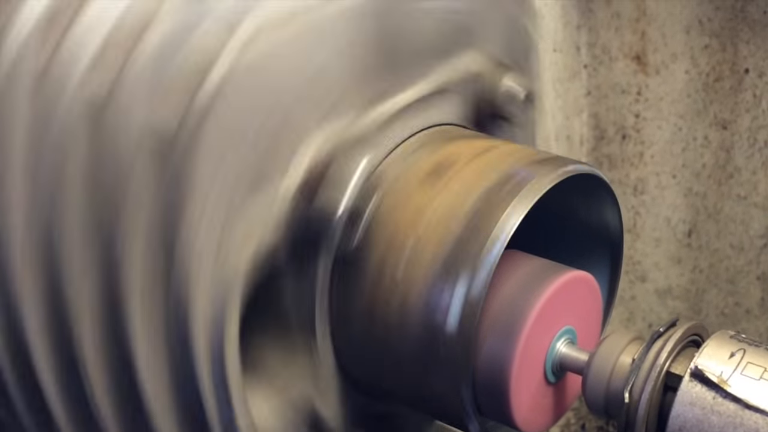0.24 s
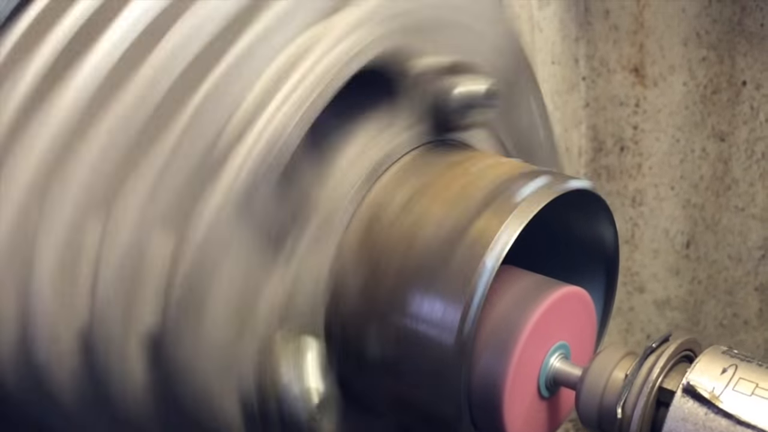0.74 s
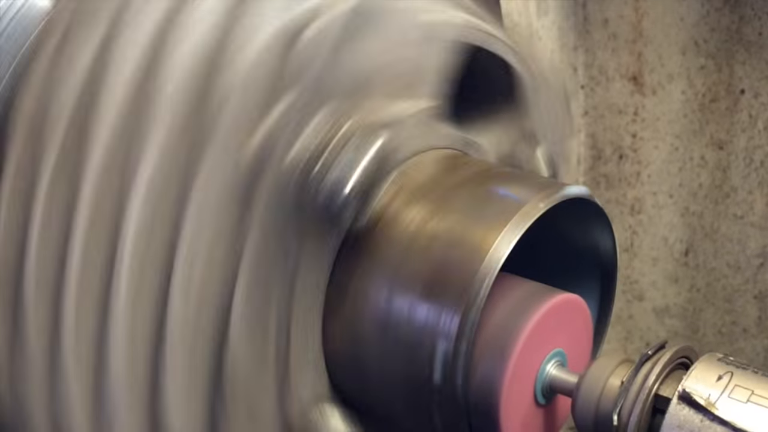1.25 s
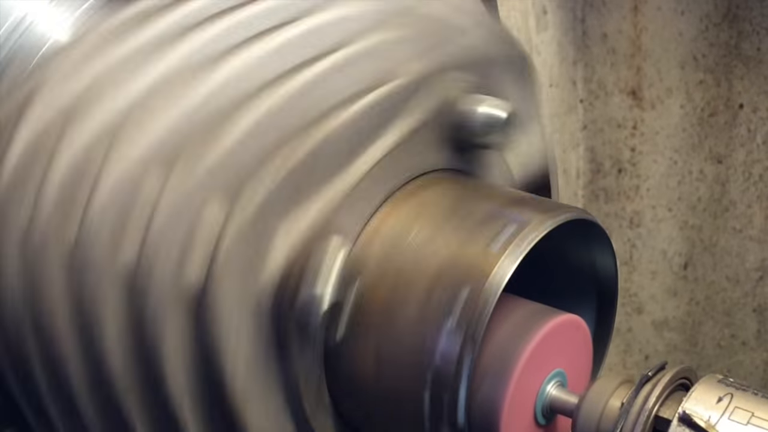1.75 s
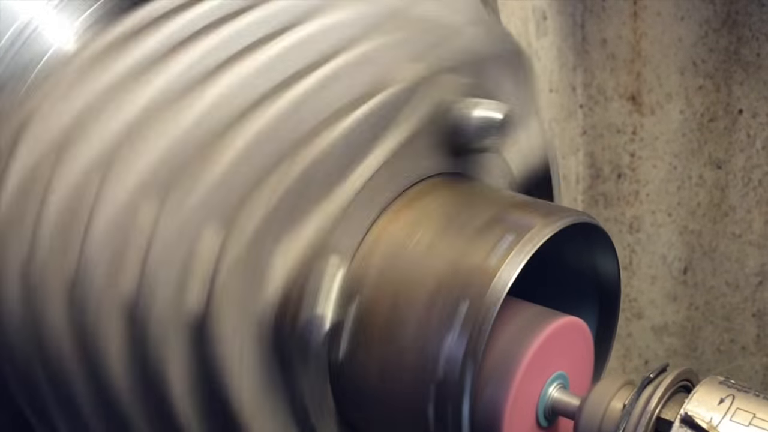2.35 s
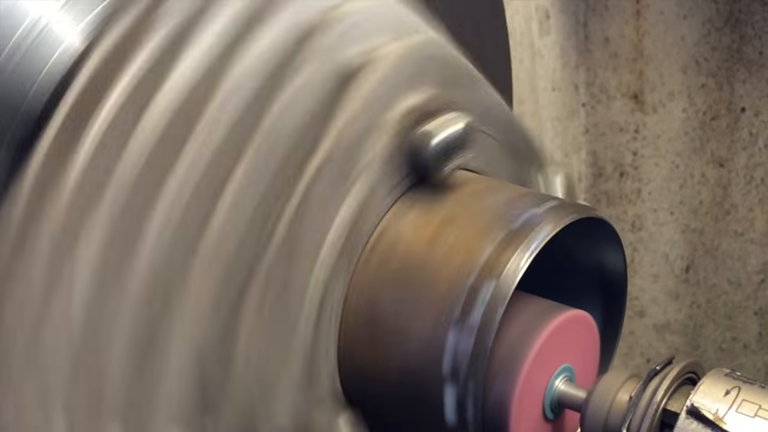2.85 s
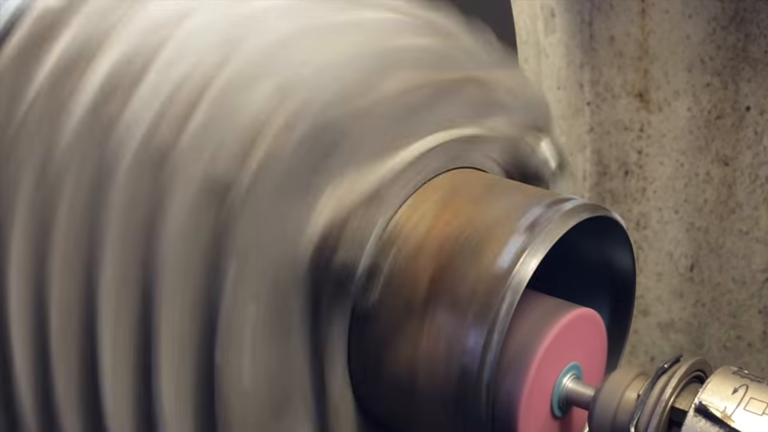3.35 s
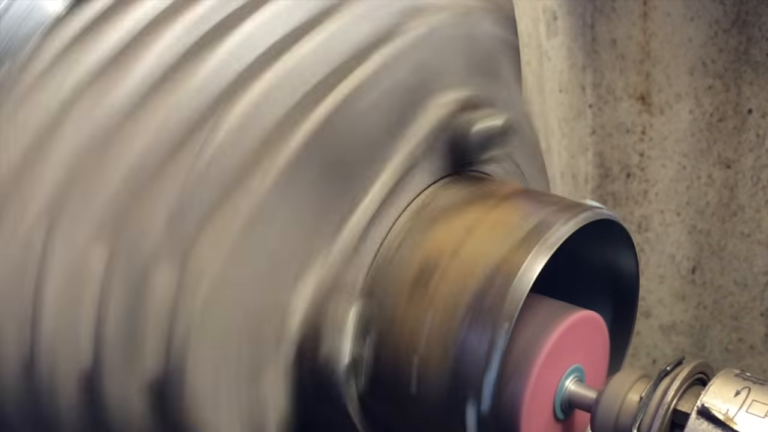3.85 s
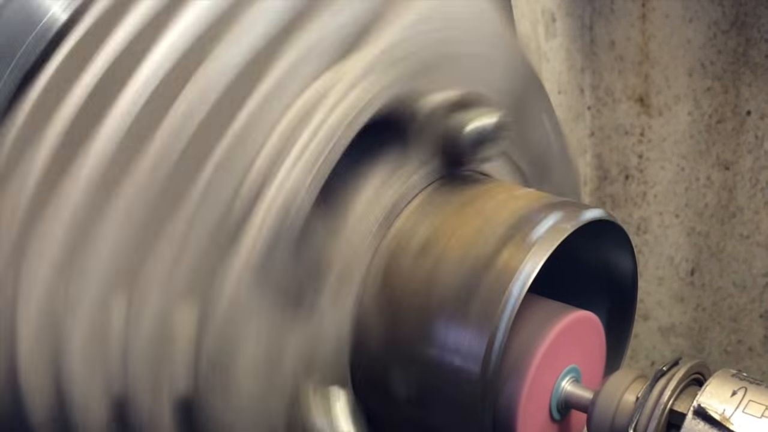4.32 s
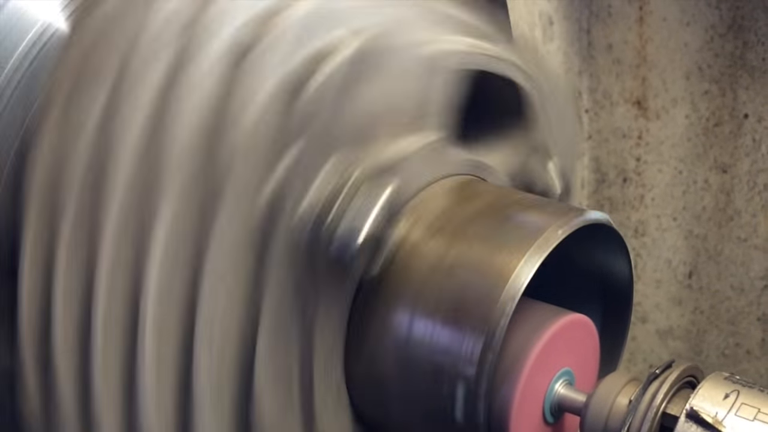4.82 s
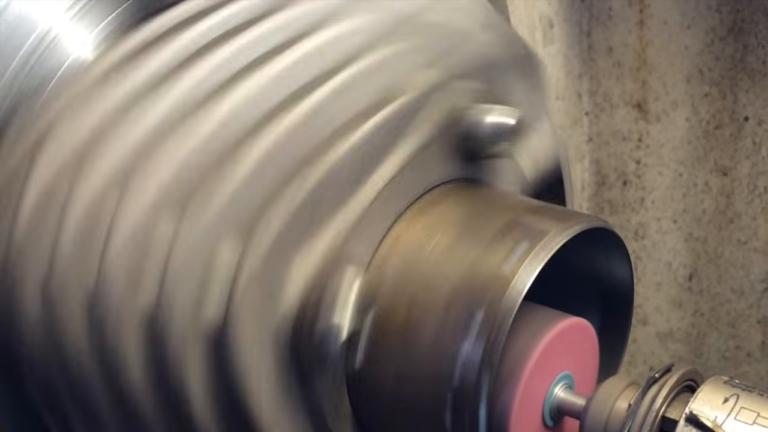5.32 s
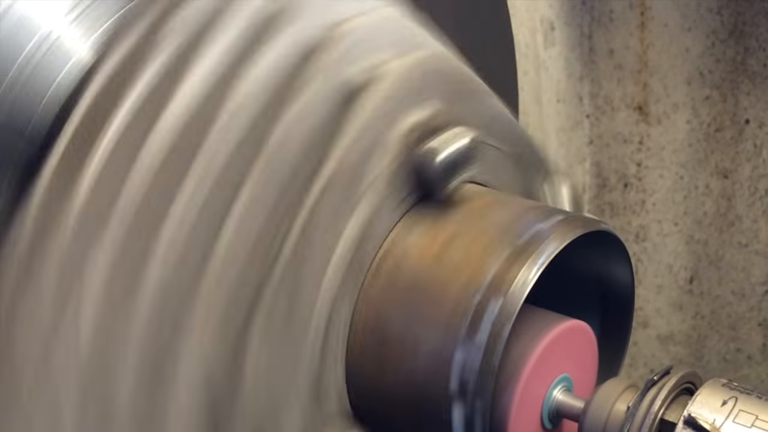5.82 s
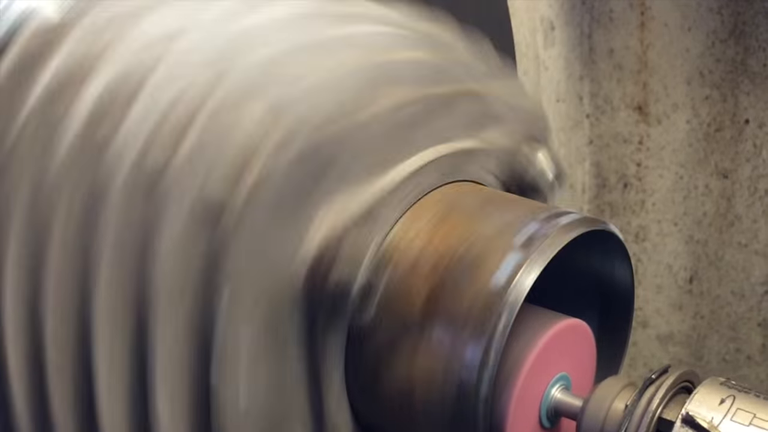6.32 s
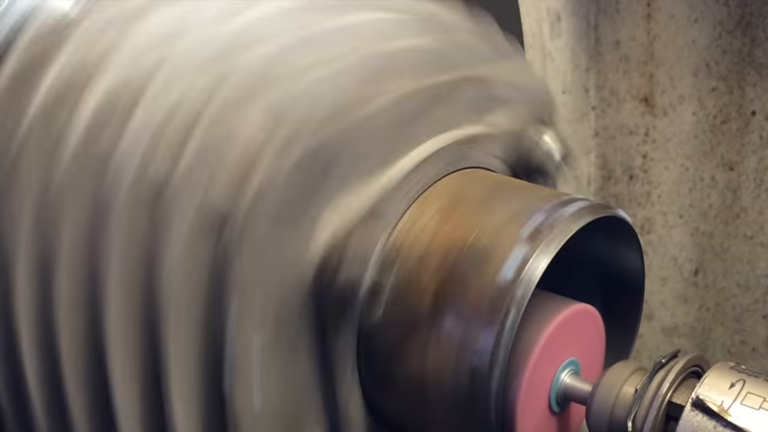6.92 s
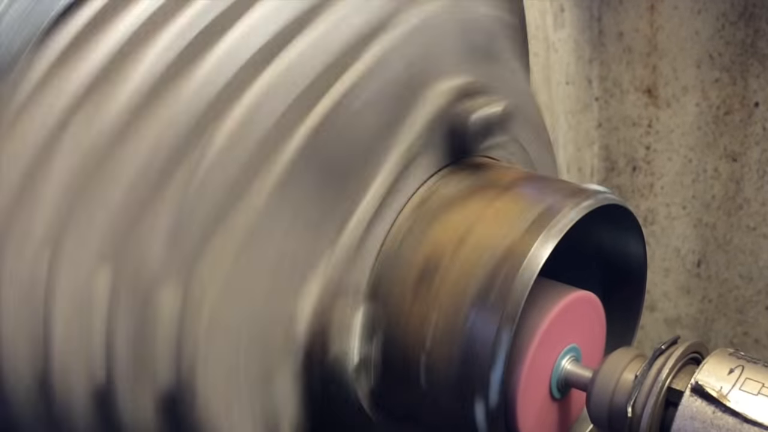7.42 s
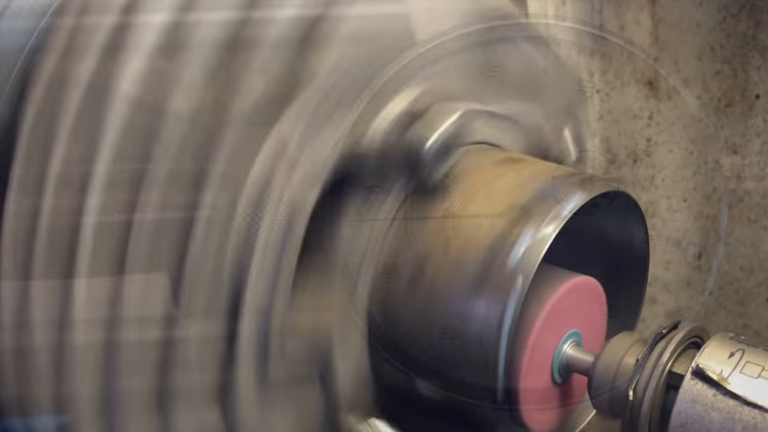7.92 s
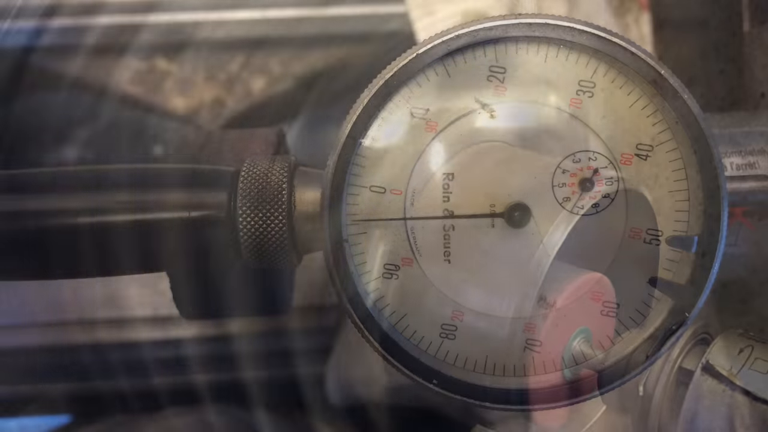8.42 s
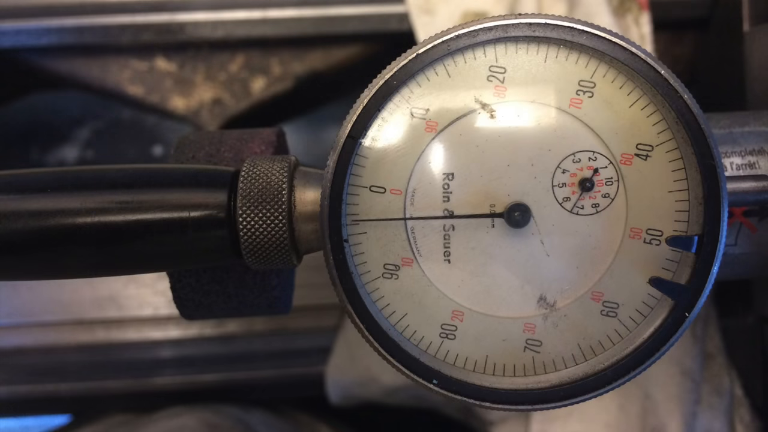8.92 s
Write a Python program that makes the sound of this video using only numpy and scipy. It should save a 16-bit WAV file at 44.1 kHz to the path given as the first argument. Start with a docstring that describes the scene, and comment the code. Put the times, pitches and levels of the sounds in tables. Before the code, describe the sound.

Close up at a lathe, a stone wheel grinds the inside of a rotating steel cylinder with a steady, bright hiss, mixed with the grinder's cooling air and faint whine. The metal rings lightly and gives a short, high squeal a little under twice a second, sharp at first and then weaker. Stray chirps and soft, dull bumps on the microphone come now and then before the sound fades away.

```python
"""At a lathe, one microphone close to a handheld grinder whose stone wheel runs inside a steel sleeve.
From the start, cooling air rushes through the grinder over its faint whine and grit hisses on the bore.
The sleeve turns slowly, its modes coming and going; from 0.6 s a high spot squeals once a turn, hardest
the first two times. Later, other modes chirp now and then and a few soft bumps reach the microphone.
Just before 8 s everything starts to fade out."""
import sys
import numpy as np
from scipy import signal
from scipy.fft import rfft, irfft
from scipy.io import wavfile
from scipy.ndimage import map_coordinates

SR = 44100
rng = np.random.default_rng(int(sys.argv[2]) if len(sys.argv) > 2 else 0)


def master(y):
    """Save y as 16-bit WAV."""
    cut = np.clip(np.atleast_2d(y).T, -1, 1)
    pcm = np.round(cut * 32767)  # scale
    wavfile.write(sys.argv[1], SR, pcm.astype(np.int16))


N = 403943
TIME = np.arange(N) / SR
TURN_S = .594  # one turn of the sleeve


def gain_of(db):
    """Decibels to amplitude."""
    return 10 ** (np.asarray(db) / 20)


def unit_rms(x):
    """Scales to unit rms."""
    return x / np.sqrt(np.mean(x ** 2) + 1e-20)


def curve_at(points, hz):
    """Interpolates (f/Hz, value) points on a log-frequency axis."""
    f, value = np.transpose(points)
    return np.interp(np.log(hz + 1), np.log(f + 1), value)


def coloured(x, gain):
    """Filters unit white noise to the amplitude density gain(hz)."""
    return irfft(rfft(x) * gain(np.fft.rfftfreq(N, 1 / SR)), N) * np.sqrt(SR / 2)


def drift(rate_hz):
    """Random wander of unit rms, mostly slower than rate_hz."""
    return unit_rms(coloured(rng.standard_normal(N), lambda hz: np.exp(-(hz / rate_hz) ** 2)))


def resonance(hz, centre, width):
    """Power response of a resonance, 1 at its top."""
    return 1 / (1 + (np.sqrt(2) - 1) * (2 * (hz - centre) / width) ** 2) ** 2


def microphone_bumps(low_cut_hz=58, slight_per_s=9, slight_db=-52, slight_s=.003):
    """Soft pushes on the microphone, a few strong among many slight; the longer, the duller."""
    # strong bumps: t/s, peak level/dB before the low cut, rise and decay time/s
    strong = [(1.892, -36, .002), (2.425, -41, .0022), (2.487, -47, .003), (2.648, -39.5, .001),
              (3.303, -44, .001), (4.409, -41, .005), (7.139, -39.5, .0025), (7.586, -43, 0.0026)]
    slight = gain_of(slight_db) * rng.uniform(-1, 1, N) * (rng.random(N) < slight_per_s / SR)
    t = np.arange(-SR // 20, SR // 20) / SR
    pushes = signal.oaconvolve(slight, np.exp(-abs(t) / slight_s), "same")
    for s, db, length in strong:
        start = round(s * SR) - len(t) // 2
        pushes[start:start + len(t)] += gain_of(db) * np.exp(-abs(t) / length)
    return signal.sosfilt(signal.butter(4, low_cut_hz, "highpass", fs=SR, output="sos"), pushes)


def motor_whine(shaft_hz=487.5, waver=.0003, rough=0.48):
    """The grinder's motor whines at multiples of its shaft speed, which wavers slightly under load."""
    # partials of the whine: multiple of the shaft speed, level/dB
    orders = [(1, -67.5), (2, -65), (3, -67), (6, -63), (12, -62.5), (24, -65)]
    turns = np.cumsum(shaft_hz * (1 + waver * drift(4))) / SR
    whine = sum(gain_of(db) * np.sqrt(2) * np.sin(2 * np.pi * k * turns) for k, db in orders)
    return whine * (1 + rough * drift(30))


def cooling_air(flicker_db=0.54):
    """Turbulent air from the grinder's fan, coloured by the cavities on its way."""
    # broad rush of air and rumble of the lathe: f/Hz, level/dB per Hz
    rush = [(20, -120), (40, -103), (60, -94.5), (90, -88.5), (140, -91), (230, -89.5), (350, -86.5),
            (600, -82.5), (850, -84), (1100, -78), (2100, -83.5), (2600, -82.5), (3700, -84.5),
            (15000, -89)]
    # resonances that the air rushes through: f/Hz, width/Hz, top level/dB per Hz
    cavities = [(460, 80, -81), (725, 85, -76.5), (940, 50, -79), (1215, 50, -78), (1315, 70, -74.5),
                (1387, 44, -68.5), (1480, 60, -80), (1815, 130, -73.5), (2240, 70, -81), (2590, 130, -76.5),
                (2870, 170, -75), (3070, 140, -72), (3290, 220, -73.8)]

    def gain(hz):
        """Rush and resonances add in power."""
        cavity_power = sum(gain_of(db) ** 2 * resonance(hz, f, width) for f, width, db in cavities)
        return np.sqrt(gain_of(curve_at(rush, hz)) ** 2 + cavity_power)
    return coloured(rng.standard_normal(N), gain) * gain_of(flicker_db * drift(21))


def contact_force(chatter_hz=92.8, chatter=0.095, overtone=0.022, flicker_db=0.63):
    """Relative force on the bore: a hand with a slight tremble, and the wheel bouncing on the steel."""
    phase = 2 * np.pi * np.cumsum(chatter_hz + 0.11 * drift(0.8)) / SR
    tremble = gain_of(flicker_db * drift(37))
    return tremble * (1 + chatter * np.cos(phase) + overtone * np.cos(2 * phase))


def grit_hiss(grains_per_s=30000, spread_db=0.8):
    """Tens of thousands of abrasive grains strike the bore each second."""
    # grit scratching the steel: f/Hz, level/dB per Hz
    scratch = [(300, -112), (2000, -87), (3600, -83.5), (4600, -74.5), (5400, -79), (6300, -76),
               (7500, -80.5), (8700, -78), (10200, -80), (11400, -85), (13500, -84), (14500, -86.5),
               (15300, -83.5)]
    strengths = rng.standard_normal(N) * gain_of(spread_db * rng.standard_normal(N))
    grains = strengths * (rng.random(N) < grains_per_s / SR)
    return coloured(unit_rms(grains), lambda hz: gain_of(curve_at(scratch, hz)))


def wall_colour(hiss, patch_hz=110, patch_turn=.08, repeat=0.57, size=1024):
    """The contact travels round the wall, shifting peaks and notches that partly return every turn."""
    # how unevenly the wall's crowd of modes colours the hiss: f/Hz, spread/dB
    mottle = [(2500, 8), (4000, 2), (5500, 1.5), (7000, 4), (8300, 7), (9500, 5.5), (11000, 1.5),
              (15000, 3.5)]
    overlap = size - size // 4
    hz, t, spectra = signal.stft(hiss, SR, nperseg=size, noverlap=overlap)
    row, turn = np.meshgrid(hz / patch_hz, t / TURN_S, indexing="ij")
    pattern, fresh = rng.standard_normal((2, size // 2, size // 2))
    returning = map_coordinates(pattern, [row, turn % 1 / patch_turn], mode="mirror")
    passing = map_coordinates(fresh, [row, turn / patch_turn], mode="mirror")
    field = unit_rms(np.sqrt(repeat) * returning + np.sqrt(1 - repeat) * passing)
    field = np.minimum(field, 2 * np.tanh(field / 2))  # overlapping modes: rounded peaks, deep notches
    gain = gain_of(curve_at(mottle, hz)[:, None] * field)
    gain /= np.sqrt(np.mean(gain ** 2, axis=1, keepdims=True))  # the mean colour stays that of the grit
    return signal.istft(spectra * gain, SR, nperseg=size, noverlap=overlap)[1][:N]


def sleeve_ring(width_hz=22, rest_db=-10.5, trim_db=-3, size=4096):
    """Each mode is a narrow, wavering ring that swells once a turn, as its belly passes the wheel."""
    # modes of the sleeve: f/Hz, loudest point/turns, swell length/turns, level/dB before trim_db
    modes = [(3337, 0.07, 0.08, -51.0), (3875, 0.85, 0.1, -49.2), (3965, 0.79, 0.7, -55.1),
             (4080, 0.74, 0.54, -54.1), (4134, 0.41, 0.07, -49.5), (4145, 0.74, 0.11, -48.5),
             (4834, 0.79, 0.12, -47.2), (4985, 0.76, 0.58, -53.7), (5803, 0.26, 0.12, -53.8),
             (5964, 0.82, 0.12, -47.6), (6233, 0.62, 0.08, -49.4), (6510, 0.99, 0.62, -53.3),
             (6782, 0.97, 0.08, -44.4), (6998, 0.18, 0.1, -52.4), (6998, 0.68, 0.13, -52.5),
             (7270, 0.94, 0.63, -55.9), (7525, 0.12, 0.1, -52.9), (7547, 0.91, 0.15, -54.8),
             (7805, 0.48, 0.1, -54.2), (7805, 0.74, 0.15, -53.3), (7816, 0.99, 0.12, -54.5),
             (7967, 0.91, 0.12, -54.2), (8225, 0.44, 0.08, -53.2), (8473, 0.1, 0.1, -53.4),
             (8770, 0.09, 0.62, -54.0), (8828, 0.89, 0.08, -51.3), (9076, 0.09, 0.15, -53.4),
             (9657, 0.04, 0.57, -51.8), (10583, 0.1, 0.17, -56.8), (11229, 0.0, 0.07, -58.9)]
    t = np.arange(size) / size * N / SR
    bins = np.fft.ifftshift(np.arange(size) - size // 2)
    band = np.sqrt(resonance(bins * SR / N, 0, width_hz))
    spectrum = np.zeros(N // 2 + 1, complex)
    for hz, angle, length, db in modes:
        ring = np.fft.ifft(band * (rng.standard_normal(size) + 1j * rng.standard_normal(size)))
        turns_away = (t / TURN_S - angle + .5) % 1 - .5
        swell = np.sqrt(np.exp2(-(2 * turns_away / length) ** 2) + gain_of(rest_db) ** 2)
        envelope = gain_of(db + trim_db) * swell * ring / ring.std()
        spectrum[round(hz * N / SR) + bins] += np.fft.fft(envelope) / size  # carried up to the pitch
    return irfft(spectrum, N) * N / np.sqrt(2)


def stick_slip(hz, catches, waver_hz=14, rough=0.17):
    """The wheel locks onto one mode for a moment at each catch (t/s, level/dB, length/s)."""
    swell = np.zeros(N)
    for s, db, length in catches:
        near = slice(*np.searchsorted(TIME, [s - 2 * length, s + 2 * length]))
        swell[near] += gain_of(db) * np.exp2(-2 * ((TIME[near] - s) / length) ** 2)
    cycles = np.cumsum(hz + waver_hz * drift(40.9)) / SR
    return np.sqrt(2) * swell * np.sin(2 * np.pi * cycles) * (1 + rough * drift(123.4))


def mode_chirps(length_s=0.024):
    """Now and then one of the lower modes catches briefly as it comes round."""
    # single catches: t/s, f/Hz, level/dB
    catches = [(1.073, 5964, -43), (1.662, 5964, -43), (3.428, 4834, -43), (4.058, 5964, -43),
               (4.655, 3875, -44), (5.124, 6233, -44), (6.78, 4134, -43), (6.969, 4145, -44),
               (8.24, 3875, -44)]
    return sum(stick_slip(hz, [(s, db, length_s)]) for s, hz, db in catches)


def high_spot_squeal(hz=6787, first_s=.582, bite_s=0.022, lead_s=0.05, touch_s=0.031, touch_db=-6):
    """Once a turn a high spot of the bore brushes the wheel, then bites and squeals."""
    # how hard the high spot bites: t/s, squeal level/dB
    bite_levels = [(1.2, -37), (1.75, -43), (2.3, -47), (4.1, -41.5), (7.1, -43), (7.7, -47)]
    times = np.arange(first_s, N / SR, TURN_S)
    levels = np.interp(times, *np.transpose(bite_levels))
    bites = [(s, db, bite_s) for s, db in zip(times, levels)]
    touches = [(s - lead_s, db + touch_db, touch_s) for s, db in zip(times, levels)]
    return stick_slip(hz, bites + touches)


def scene():
    """Grinder and sleeve close to one microphone, the same in both channels."""
    ringing = sleeve_ring()
    grinding = contact_force() * (wall_colour(grit_hiss()) + ringing)
    squeals = high_spot_squeal() + mode_chirps()
    mono = grinding + squeals + cooling_air() + motor_whine() + microphone_bumps()
    return np.array([mono, mono])


def record(dry, fade_start_s=7.865, fade_s=1.0, high_cut_hz=15300):
    """An S-shaped closing fade, then a steep high cut."""
    fade = np.cos(np.pi / 2 * np.clip((TIME - fade_start_s) / fade_s, 0, 1)) ** 2
    high_cut = signal.firwin(1023, high_cut_hz, window=("kaiser", 9), fs=SR)
    return signal.oaconvolve(dry * fade, high_cut[None], "same")


dry = scene()
out = record(dry)
master(out)
```